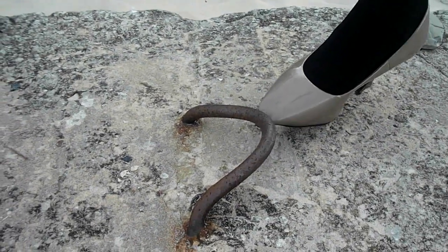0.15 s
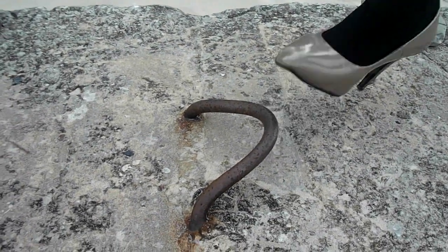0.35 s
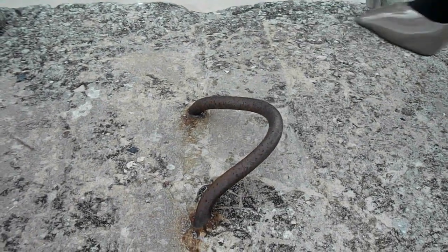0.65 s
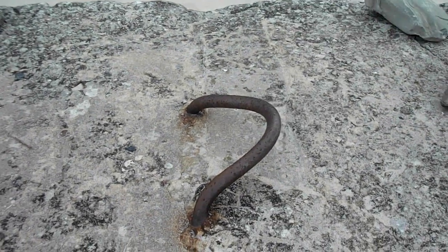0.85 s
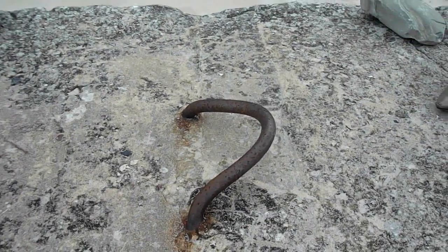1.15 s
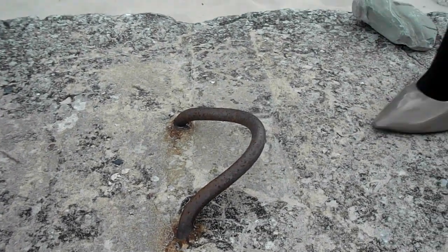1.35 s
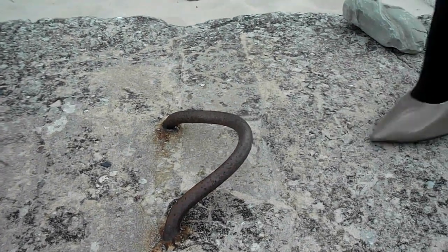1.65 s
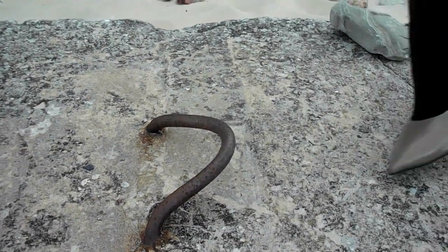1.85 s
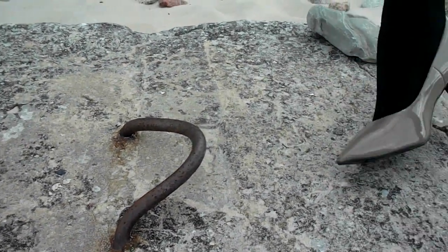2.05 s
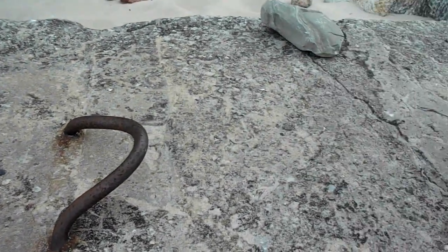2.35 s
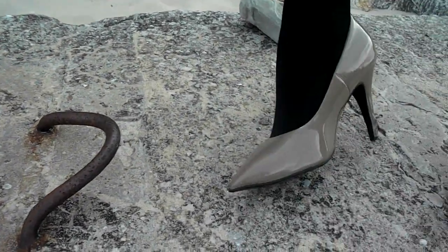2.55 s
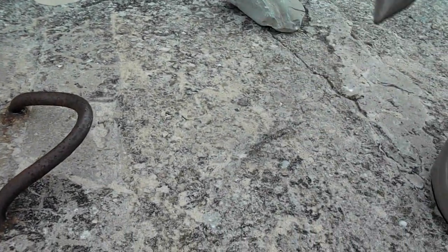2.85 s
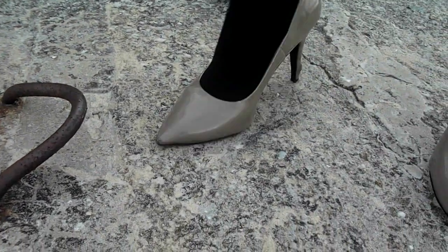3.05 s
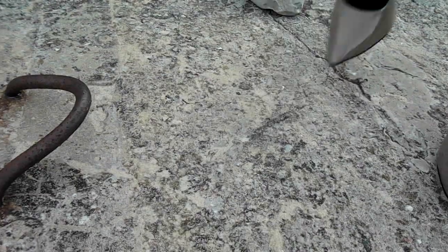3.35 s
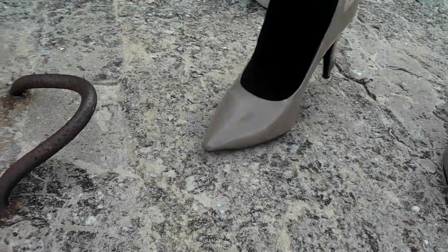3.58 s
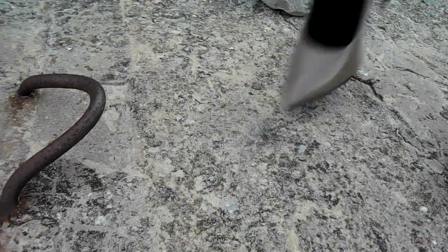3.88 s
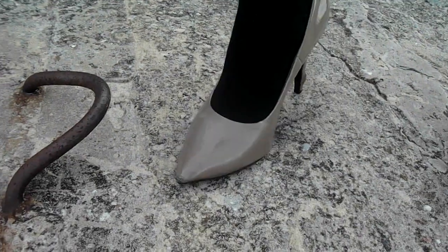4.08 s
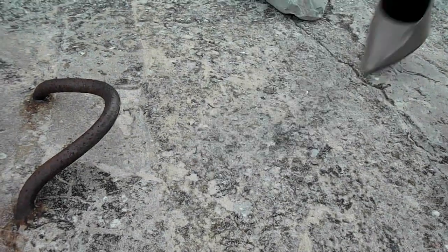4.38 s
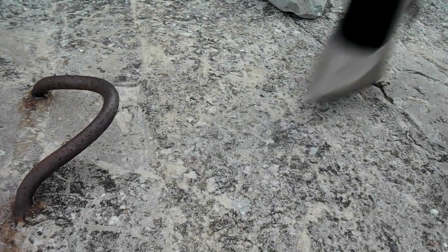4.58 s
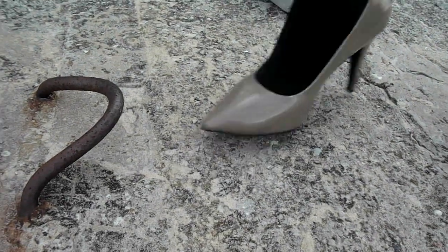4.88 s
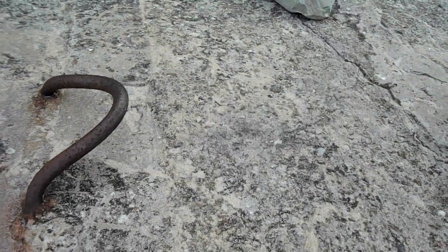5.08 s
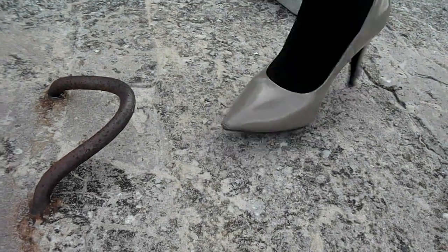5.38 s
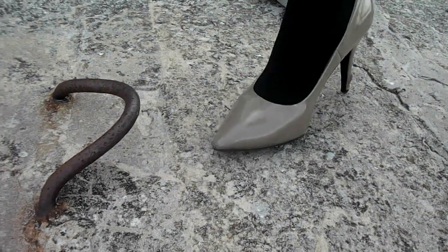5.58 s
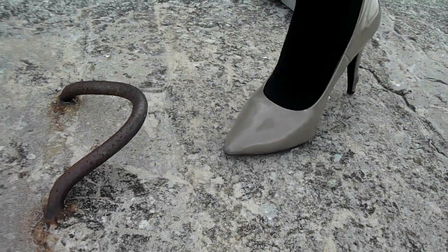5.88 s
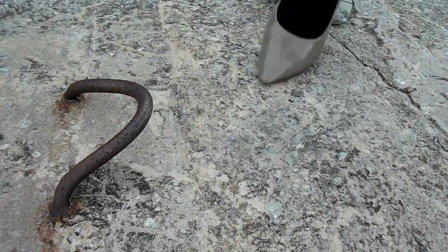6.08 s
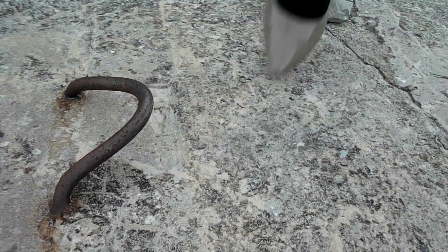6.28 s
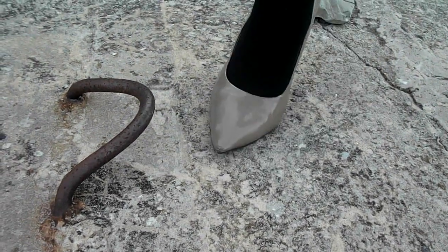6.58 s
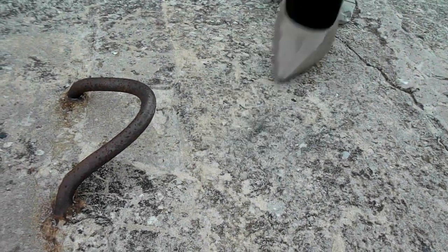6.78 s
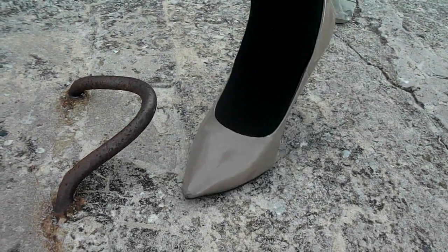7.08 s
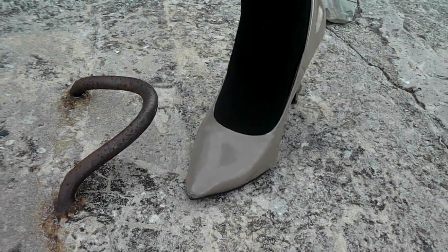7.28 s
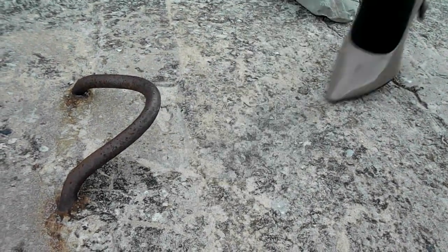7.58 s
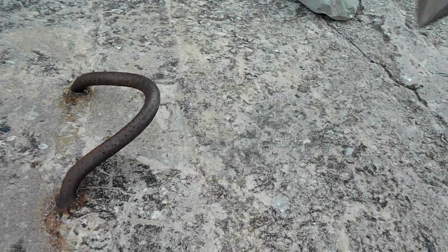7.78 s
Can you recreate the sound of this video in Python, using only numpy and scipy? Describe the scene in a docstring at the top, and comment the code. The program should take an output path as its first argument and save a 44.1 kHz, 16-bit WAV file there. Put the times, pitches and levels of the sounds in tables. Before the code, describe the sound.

Stiletto shoes stamp and skid on a gritty concrete slab, close to a small microphone. The first step clicks and leaves an iron loop faintly ringing. Sharp heel ticks and hollow knocks follow, roughly one or two a second, mixed with short crunchy drags of the sole over sand. The hardest stamps overload slightly. Far surf and light wind fill the gaps, with no echo.

```python
"""Outdoors on a gritty concrete slab, a small camera microphone close to a pair of stiletto shoes.
They stamp, skid and scrape: sand cracks under the sole, the heel tip ticks, the shoe knocks,
and one toe sets an iron loop in the slab ringing. Far surf and light wind fill the gaps.
The camera's gain control ducks them after each loud contact, and the hardest stamps overload it."""
import sys
import numpy as np
from scipy import signal
from scipy.fft import rfft, irfft, next_fast_len
from scipy.io import wavfile
from scipy.ndimage import uniform_filter1d

SR = 44100
rng = np.random.default_rng(int(sys.argv[2]) if len(sys.argv) > 2 else 0)


def materialize(psi):
    """Save the field psi as 16-bit PCM at rate SR to the path in sys.argv[1].

    A 1-D psi becomes a single channel; in a 2-D psi each row is a channel.
    """
    bounded = np.clip(np.atleast_2d(psi).T, -1, 1)
    quanta = np.round(bounded * 32767).astype(np.int16)
    wavfile.write(sys.argv[1], SR, quanta)


N = 350154

# modes of the heel tip: pitch_hz, level_db, t60_s
HEEL_MODES = [(2922, -7, 0.0076), (4510, 6, 0.0031), (6000, 3.5, 0.0019), (9080, -10.5, 0.0044)]
# slow swell of the background: time_s, surf_db, wind_db
AMBIENCE_LEVELS = [(0, -36.5, -34), (1, -40, -39.5), (2, -41.5, -42.5), (3, -38, -34), (4, -34, -31.5),
                   (5.1, -41.5, -41.5), (6, -41.5, -40), (7, -44.5, -40.5), (8, -43.5, -44.5)]


def sliding_shoes():
    """Close up: sand cracks under the sliding shoe; the jolts ring the heel tip and shake the sole."""
    t = np.arange(N) / SR
    crunch, thud, squeal_hz = np.zeros(N), np.zeros(N), np.full(N, 4500.)
    for time_s, crunch_db, thud_re_crunch_db, pitch_hz in footwork():
        on = (t >= time_s[0]) & (t < time_s[-1])
        crunch[on] += gain_of(np.interp(t[on], time_s, crunch_db))
        thud[on] += gain_of(np.interp(t[on], time_s, crunch_db + thud_re_crunch_db))
        squeal_hz[on] = np.interp(t[on], time_s, pitch_hz)
    overload_thump = resonate(crunch, 55, 22)  # short and low, as a hard stamp overloads the camera
    overload_tail = resonate(resonate(crunch, 31, 24), 31, 24)  # a deep tail after the hardest stamps
    decay = np.exp(-1 / (0.024 * SR))
    trickle = signal.lfilter([1 - decay], [1, -decay], crunch)  # loose sand runs on after the shoe stops
    crunch = crunch + gain_of(-29) * trickle
    cracks = grains(per_s=4000, spread_db=4.03, clump_db=2.8)
    crunch *= gain_of(1.5 * drift(0.014))  # the sole catches and lets go
    shoe = crushed_sand(crunch, cracks, squeal_hz) + thud * flexing_sole()
    return shoe + gain_of(-23.5) * overload_thump + gain_of(-13) * overload_tail


def footwork():
    """Each stamp, scuff and drag as curves: time_s, crunch_db, thud_re_crunch_db, pitch_hz."""
    # hard stamps that skid on:
    # start_s, skid_s, stop_s, landing_db, full_weight_db, thud_re_crunch_db, pitch_hz
    stamps = [(0.255, 0.0043, .014, -21, -7.5, -1, 3140), (0.791, 0.0082, 0.01, -13.5, -23.5, -6, 4330),
              (1.12, 0.0016, 0.024, -15.5, -20.5, -15, 5200), (2.358, 0.028, 0.029, 14.5, 3.5, -24.5, 4570),
              (2.984, .016, 0.011, 0.5, 22, -11, 5470), (3.06, .009, 0.037, -9, -4, -11, 3500),
              (3.449, 0.026, 0.021, 3.5, 24.5, -15.5, 5130), (3.85, 0.024, 0.019, 8, 21, -17.5, 4100),
              (4.545, 0.0073, .022, 9, 13, -6.5, 3860), (5.279, 0.0021, .012, 1, -4, 5, 3980),
              (5.287, .005, .015, 3, 14, -5, 3215), (6.229, .028, .011, -7, 18, -17, 5090),
              (6.953, 0.022, 0.028, 3.5, 13, -14, 3470), (7.793, 0.014, 0.018, -5.5, 12.5, -14.5, 5230)]
    land_s, settle_db = 0.0013, 15.5  # as the skid dies the sole settles: more thud against the crunch
    for start_s, skid_s, stop_s, landing_db, full_db, thud_db, pitch_hz in stamps:
        time_s = np.cumsum([start_s - land_s, land_s, skid_s, stop_s])
        crunch_db = np.array([-62, landing_db, full_db, full_db - 43.5])
        yield time_s, crunch_db, thud_db + np.array([0, 0, 0, settle_db]), np.full(4, pitch_hz)
    # light rubs of toe or heel: start_s, length_s, first_db, last_db, thud_re_crunch_db, pitch_hz
    scuffs = [(0.433, .004, -30.5, -18.5, -14, 4430), (0.819, 0.0089, -27, -28, -14, 3760),
              (1.993, .016, -33, -34.5, -12, 3490), (2.526, .007, -26, -17.5, -7, 3420),
              (3.014, .026, -17.5, -16, -4, 4920), (3.047, .006, -21.5, -21.5, -1.5, 5000),
              (3.131, 0.044, -21, -19.5, -8, 3900), (3.497, 0.038, -13.5, -7.5, -2, 4300),
              (3.891, 0.026, -12.5, -5.5, -6, 4050), (3.927, 0.028, -12.5, -24, -0.5, 5250),
              (3.963, .013, -11.5, -10.5, -13.5, 5470), (4.147, 0.019, -18, -31.5, -6.5, 5520),
              (4.574, .006, -25, -24.5, -3, 3000), (4.626, 0.013, -30.5, -32.5, -12, 3190),
              (4.595, 0.016, -16, -27, -14, 3160), (4.759, .016, -23.5, -23.5, -6.5, 5000),
              (4.815, 0.0082, -33, -20.5, -3, 4840), (5.314, 0.035, -25.5, -38, 6.5, 2900),
              (5.361, .018, -25.5, -31.5, 0, 4360), (5.524, .036, -31, -36, -10.5, 3490),
              (6.268, 0.015, -22, -36, -8, 4490), (6.29, .052, -48, -33, -9, 4860),
              (6.994, 0.014, -14.5, -25.5, 2, 4200), (7.013, 0.017, -20.5, -12.5, -11, 5700),
              (7.039, 0.024, -17.5, -31, -7, 4420), (7.825, .018, -39.5, -33.5, -7, 5200),
              (7.88, .04, -40, -33, -24, 3970)]
    touch_s, lift_s, fade_db = 0.0039, 0.008, 23
    for start_s, length_s, first_db, last_db, thud_db, pitch_hz in scuffs:
        time_s = np.cumsum([start_s - touch_s, touch_s, length_s, lift_s])
        crunch_db = np.array([first_db - fade_db, first_db, last_db, last_db - fade_db])
        yield time_s, crunch_db, thud_db, np.full(4, pitch_hz)
    # long drags of the sole: thud_re_crunch_db, first_hz, last_hz, pressure curve of (time_s, crunch_db)
    drags = [ (-15.5, 4500, 4370, [(1.174, -53), (1.198, -18.5), (1.236, -4.5), (1.27, -15.5), (1.346, -4),
             (1.362, -43.5)]), (-13.5, 4300, 4900, [(1.518, -33), (1.545, -12.5), (1.565, -26.5),
             (1.573, -10.5), (1.645, -5.5), (1.687, -16), (1.695, -48)]), (-12, 4200, 3300, [(1.757, -44.5),
             (1.761, -19.5), (1.767, -2.5), (1.8, -1.5), (1.841, -18.5), (1.855, -52.5)]),
             (-16, 4600, 3100, [(2.012, -43), (2.024, -16), (2.088, -5), (2.106, -18), (2.118, -56)]),
             (-19.5, 1500, 5200, [(4.16, -31.5), (4.181, -13), (4.189, -26), (4.195, -8), (4.218, 0),
             (4.263, 3), (4.303, -11.5), (4.309, -36)]), (-16, 4300, 3900, [(5.858, -67), (5.866, -20.5),
             (5.916, -13.5), (5.936, -21.5), (5.965, -12.5), (5.999, -11.5), (6.055, -10.5), (6.081, -26)]),
             (-16, 4000, 3400, [(6.604, -36.5), (6.618, -16.5), (6.65, -22), (6.66, -9.5), (6.686, -7.5),
             (6.7, -18), (6.712, -67.5)]), (-22.5, 1700, 5700, [(7.354, -33), (7.4, -5), (7.414, -4.5),
             (7.43, -2.5), (7.439, 4.5), (7.448, -1), (7.49, -2.5), (7.536, -23.5), (7.55, -14),
             (7.56, -47)]), ]
    for thud_db, first_hz, last_hz, pressure in drags:
        time_s, crunch_db = np.transpose(pressure)
        extra_thud_db = 0.42 * (crunch_db.max() - crunch_db)  # light pressure favours the thud
        pitch_hz = np.interp(time_s, time_s[[0, -1]], [first_hz, last_hz])
        yield time_s, crunch_db, thud_db + extra_thud_db, pitch_hz


def crushed_sand(crunch, cracks, squeal_hz):
    """Grains of each size ring briefly at their own pitch; the heel tip squeals a little over them."""
    # spectrum of crushed sand: frequency_hz, level_db
    sand_spectrum = [(710, -37.5), (1200, -12.5), (2270, -8.5), (3290, -2.5), (5710, -1.5), (13000, -22.5),
                     (16000, -51)]
    ringing = sum(resonate(grains(2500, 2.6, 2.4), hz, 0.4 * hz) for hz in np.geomspace(1500, 13000, 6))
    sand = unit_rms(coloured(unit_rms(ringing) + 0.58 * cracks, sand_spectrum))
    squeal = unit_rms(resonate(cracks, squeal_hz * (1 + 0.15 * drift(0.006)), 800))
    dull_sand = unit_rms(resonate(sand, 3100, 5000))
    brightness = np.clip(crunch / gain_of(-18), 0.25, 1)  # light pressure breaks few of the finest grains
    return crunch * unit_rms(brightness * sand + (1 - brightness) * dull_sand + 0.59 * squeal)


def flexing_sole():
    """Jolted by the grit, the sole gives a dull, wandering note."""
    pitch_hz = 800 * (1 + 0.27 * np.tanh(drift(0.011)))
    jolts = grains(per_s=2500, spread_db=3.05, clump_db=1.1)
    return unit_rms(resonate(resonate(jolts, pitch_hz, 800), pitch_hz, 870))


def heel_taps():
    """Each blow ticks on the heel tip and knocks the shoe, higher or lower by where it lands."""
    # heel blows and single cracks of grit: start_s, tick_peak_db, knock_peak_db, knock_hz
    blows = [(0.2583, -1.5, 1, 867), (0.4335, -13, -22.5, 650), (0.5327, -18.5, -42, 450),
             (0.5756, -23, -36, 450), (0.5936, -20, -34, 450), (0.6085, -24, -42, 450),
             (0.679, -25, -35, 450), (0.7897, -4.5, -1, 770), (0.7986, -8, -33, 940),
             (0.8096, -10.5, -5, 577), (0.8153, -7, -19, 740), (0.827, -14, -32, 780),
             (0.841, -24, -40, 450), (0.848, -22, -40, 450), (0.884, -20, -38, 450),
             (1.1215, -18, -12.5, 1620), (1.125, -29, -15, 1620), (1.1383, -19, -34, 450),
             (1.1433, -15, -39, 450), (1.195, -6, -28, 980), (1.2001, 0.5, -29, 1010),
             (1.237, -2, -18, 1400), (1.5314, -6, -21, 450), (1.5416, -1, -13, 534), (1.7626, 3, -11, 1490),
             (1.9277, -27, -44, 450), (2.356, 5, 1, 830), (2.5323, -16, -19, 1220), (2.9844, 13, 0, 1670),
             (3.063, 0, 0, 770), (3.104, -14, -35, 600), (3.153, -30, -15, 700), (3.163, -22, -9, 760),
             (3.179, -11, -33, 600), (3.4524, 16.5, -20, 1200), (3.8505, 9, -17, 1830),
             (3.97, -6, -27, 1410), (4.1225, -17, -40, 500), (4.143, -6.5, -20, 500),
             (4.1793, -30, -2.5, 517), (4.1849, -30, -6, 500), (4.1935, 10.5, -13, 1080),
             (4.5447, 17, 13.5, 877), (4.6, -12, 0, 2800), (4.761, -29, -15, 1510), (4.7698, -10, -32, 584),
             (4.7856, -17, -40, 1230), (4.8185, -14, -10, 2030), (4.823, -20, -10.5, 487),
             (5.2793, 16, 12.5, 995), (5.286, 27.5, 21.5, 1013), (5.3103, -5, -12, 920),
             (5.3305, -9, -2.5, 955), (5.3412, -5, -14, 500), (5.3622, -6.5, -4.5, 845),
             (5.5333, -9, -32, 834), (5.547, -2.5, -39, 1760), (5.556, -12, -39, 450),
             (5.6664, -17, -35, 450), (5.711, -18.5, -30, 1070), (5.8741, 0.5, -37, 1570),
             (5.881, -4, -33, 530), (5.901, -23, -36, 730), (5.9054, -5, -35, 710), (6.2322, 14, -18, 1660),
             (6.585, -21, -41, 450), (6.5959, -21, -41, 840), (6.6572, -1, -4.5, 780),
             (6.9522, -14, -7, 606), (6.984, 17.5, 6.5, 576), (7.3827, -16, -3.5, 590),
             (7.388, -25, -6.5, 557), (7.6862, -23.5, -33, 794), (7.7927, -7, -11, 1070),
             (7.805, 14, 7, 815)]
    # modes of the shoe's body: pitch_hz, level_db, t60_s
    shoe_modes = [(296, -15.5, 0.025), (656, -8.5, 0.0078), (996, 14, 0.0055), (1750, 2.5, 0.0065)]
    strongest_hz = max(shoe_modes, key=lambda mode: mode[1])[0]
    out = np.zeros(N)
    for start_s, tick_db, knock_db, knock_hz in blows:
        tick = ring(HEEL_MODES, detune=1 + 0.12 * rng.standard_normal(len(HEEL_MODES)))
        knock = ring(shoe_modes, detune=knock_hz / strongest_hz, rise_s=0.001)
        add(out, start_s, gain_of(tick_db) * tick / abs(tick).max())
        add(out, start_s, gain_of(knock_db) * knock / abs(knock).max())
    return out


def stray_grains():
    """Loose grains crack now and then: faint ticks, pitched above the heel tip."""
    level_db = -46.5 + 4.4 * np.minimum(rng.exponential(1, N), 4)
    cracks = gain_of(level_db) * (rng.random(N) < 25 / SR)  # about 25 a second
    tick = ring([(1.3 * hz, db, t60_s) for hz, db, t60_s in HEEL_MODES], size=512)
    return signal.oaconvolve(cracks, tick)[:N]


def iron_loop():
    """A toe touches the iron loop once and leaves it ringing."""
    # modes of the loop: pitch_hz, level_db, t60_s
    iron_modes = [(1540, -27, 0.081), (1750, -30, 0.59), (2800, -14, 0.053), (3451, -24, 0.1)]
    out = np.zeros(N)
    add(out, start_s=0.258, sound=ring(iron_modes, size=SR))
    return out


def background():
    """Far surf on a slow swell, lumpy wind on the microphone, and the microphone's own hiss."""
    # spectrum of distant surf: frequency_hz, level_db
    surf_spectrum = [(40, -32.5), (300, -1.5), (600, -2), (1250, -2), (2000, -1.5), (5200, -1.5),
                     (6600, -8.5), (9700, -14), (16000, -32)]
    time_s, surf_db, wind_db = np.transpose(AMBIENCE_LEVELS)
    t = np.arange(N) / SR
    surf = unit_rms(coloured(rng.standard_normal(N), surf_spectrum))
    surf *= gain_of(np.interp(t, time_s, surf_db))
    wind = unit_rms(resonate(resonate(rng.standard_normal(N), 170, 420), 170, 420))
    wind *= gain_of(np.interp(t, time_s, wind_db) + 2.4 * drift(0.032))
    hiss = unit_rms(resonate(rng.standard_normal(N), 9600, 700)) * gain_of(-57)
    return surf + wind + hiss


def grains(per_s, spread_db, clump_db):
    """Cracks of random sign and size, in clumps a few milliseconds long."""
    sizes = gain_of(spread_db * np.minimum(rng.exponential(1, N), 5)) * rng.choice([-1., 1.], N)
    cracks = sizes * (rng.random(N) < per_s / SR)
    return unit_rms(cracks * gain_of(clump_db * drift(0.0029)))


def ring(modes, detune=1, rise_s=0.00033, size=2048):
    """Dying sines of a struck body, building up over the contact; modes tuned higher die sooner."""
    t = np.arange(size) / SR
    tones = sum(gain_of(db - 60 * t / t60_s * ratio ** 0.8) * np.sin(2 * np.pi * hz * ratio * t)
                for (hz, db, t60_s), ratio in zip(modes, detune * np.ones(len(modes))))
    return tones * (1 - np.exp(-t / rise_s))


def resonate(x, hz, width_hz):
    """A resonance that can glide: shifts hz down to zero, smooths, and shifts back."""
    carrier = np.exp(2j * np.pi * np.cumsum(hz * np.ones(len(x))) / SR)
    pole = np.exp(-np.pi * width_hz / SR)
    return 2 * (carrier * signal.lfilter([1 - pole], [1, -pole], x / carrier)).real


def coloured(x, spectrum):
    """Equalises x along points of frequency_hz, level_db."""
    point_hz, point_db = np.transpose(spectrum)
    size = next_fast_len(len(x))
    hz = np.fft.rfftfreq(size, 1 / SR)
    curve_db = np.interp(np.log(hz + 1), np.log(point_hz + 1), point_db)
    return irfft(rfft(x, size) * gain_of(curve_db), size)[:len(x)]


def drift(smooth_s):
    """A smooth random wander with rms 1."""
    size = max(round(smooth_s * SR), 2)
    return unit_rms(uniform_filter1d(uniform_filter1d(rng.standard_normal(N), size), size))


def gain_of(db):
    """Decibels to an amplitude factor."""
    return 10 ** (np.asarray(db) / 20)


def unit_rms(x):
    """Scales to rms 1."""
    return x / np.sqrt(np.mean(x ** 2) + 1e-20)


def add(mix, start_s, sound):
    """Mixes a sound in at start_s."""
    part = mix[round(start_s * SR):][:len(sound)]
    part += sound[:len(part)]


def scene():
    """Open air, mono, no echo: the shoes close up over the background."""
    return (sliding_shoes() + heel_taps() + stray_grains() + iron_loop() + background())[None]


def record(dry):
    """The camera: a small capsule, gain control that follows its own output, overload and a band limit."""
    thinned = signal.sosfilt(signal.butter(2, 70, "high", fs=SR, output="sos"), dry)  # deep bass is lost
    block, threshold_db, headroom = 88, -19, gain_of(3)
    fall_per_block, rise_db_per_s, pull_per_s = 0.0863, 31, 1.14
    gain_db = [0]
    for part in np.resize(thinned[0], (N // block + 1, block)):
        sensed = np.clip(part * gain_of(gain_db[-1]), -headroom, headroom)
        over_db = max(10 * np.log10(np.mean(sensed ** 2) + 1e-12) - threshold_db, 0)
        recovery_db = (rise_db_per_s - pull_per_s * gain_db[-1]) * block / SR
        gain_db.append(min(0, gain_db[-1] + recovery_db - fall_per_block * over_db))
    ducked = thinned * gain_of(np.interp(np.arange(N) / block, np.arange(len(gain_db)), gain_db))
    clipped = np.clip(ducked, -1, 1)
    lowpass = signal.firwin(255, 15700, window=("kaiser", 4), fs=SR)
    return np.clip(signal.oaconvolve(clipped, lowpass[None], "same"), -1, 1)


dry = scene()
out = record(dry)
materialize(out)
```